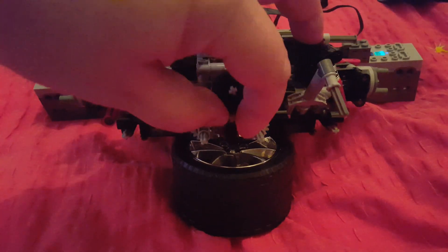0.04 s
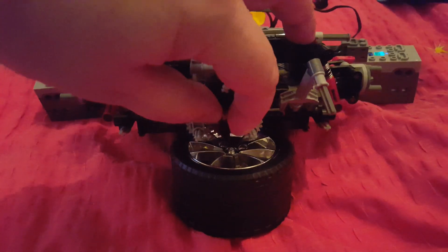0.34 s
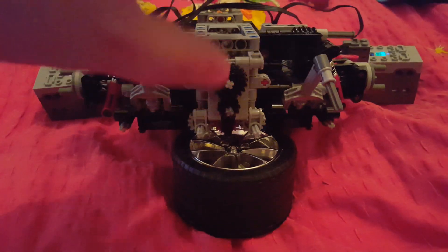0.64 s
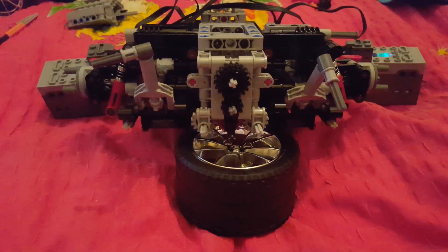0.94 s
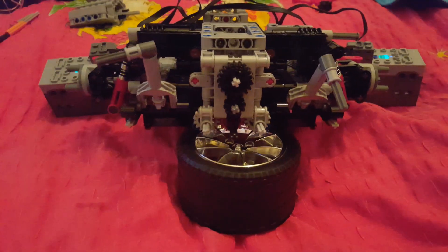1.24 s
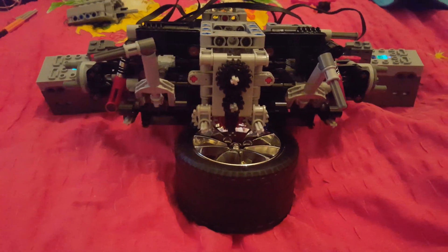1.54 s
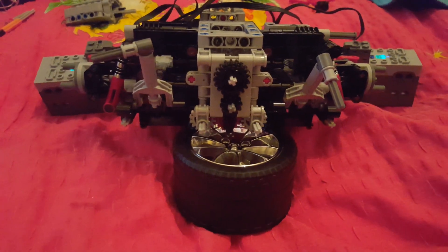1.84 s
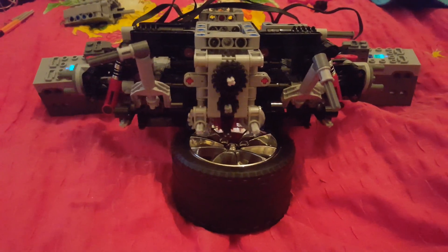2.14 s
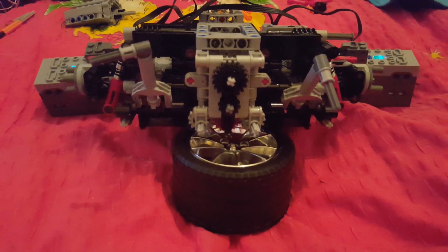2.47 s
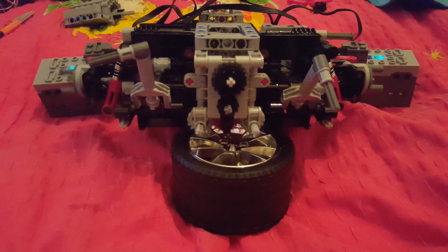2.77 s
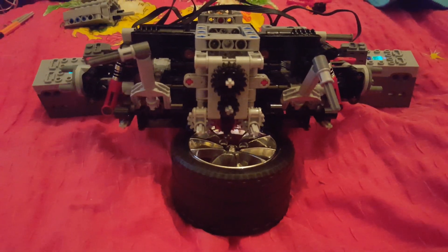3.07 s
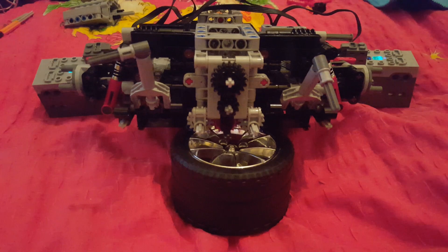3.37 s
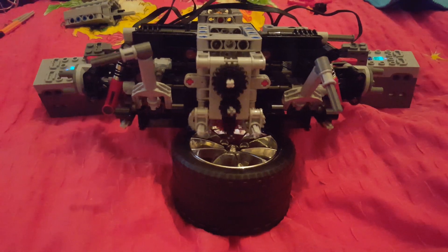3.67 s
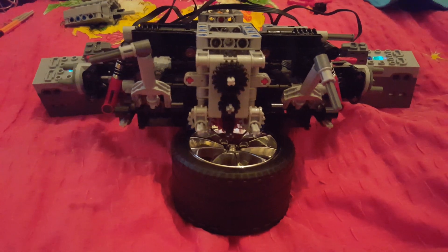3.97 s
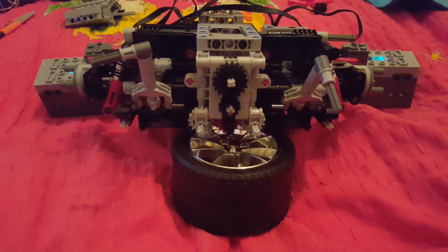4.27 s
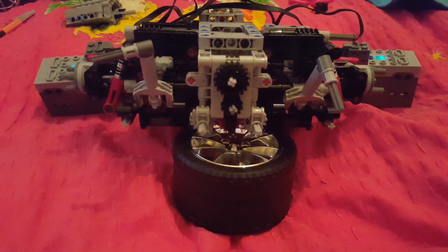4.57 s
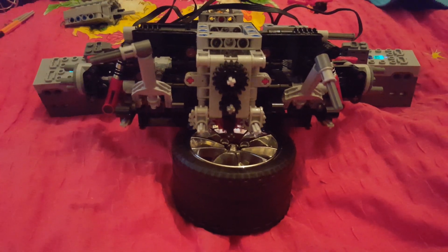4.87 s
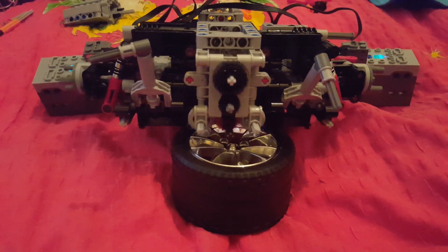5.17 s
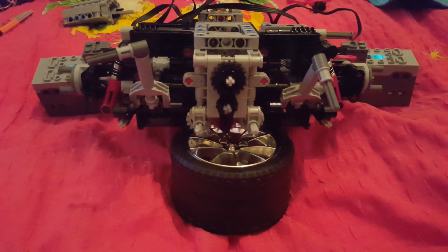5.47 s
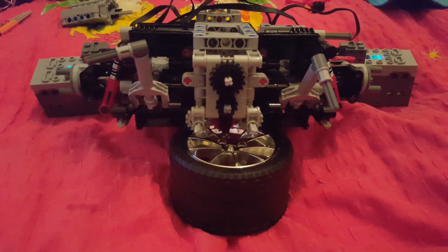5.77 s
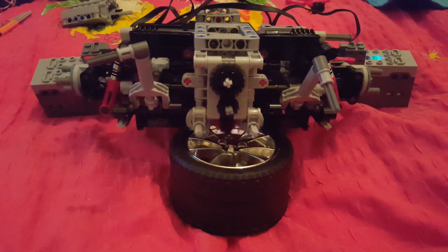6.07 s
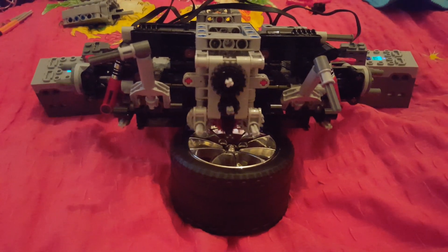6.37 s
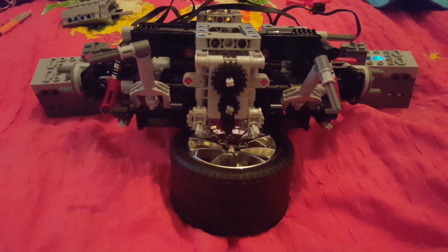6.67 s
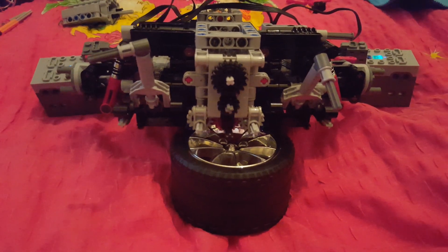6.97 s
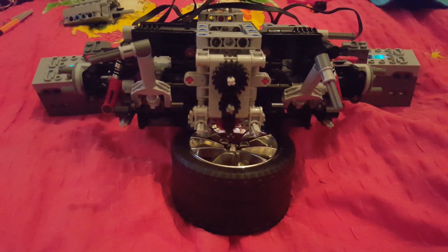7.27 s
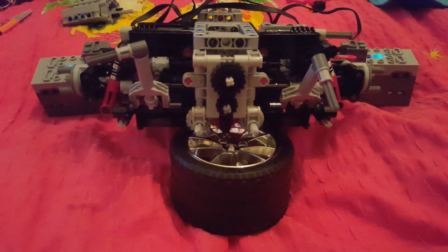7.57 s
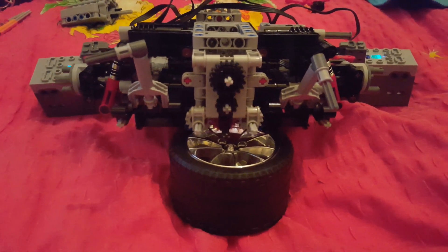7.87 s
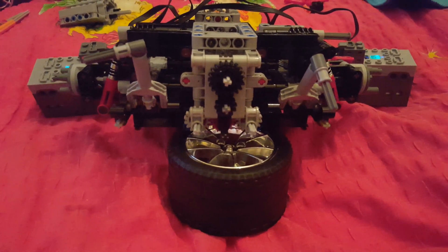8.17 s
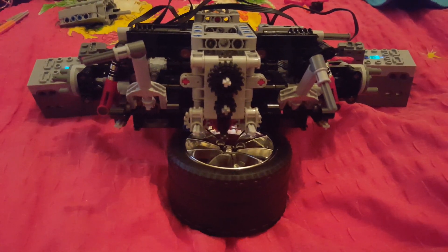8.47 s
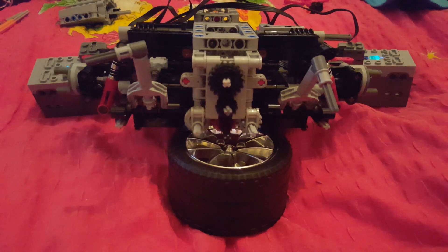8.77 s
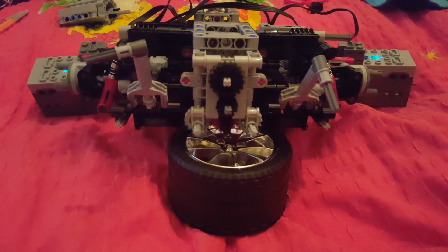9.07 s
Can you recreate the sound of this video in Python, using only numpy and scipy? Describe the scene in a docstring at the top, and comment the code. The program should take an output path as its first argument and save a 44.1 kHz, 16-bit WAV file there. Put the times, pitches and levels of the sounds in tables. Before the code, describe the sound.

A lever clicks and a plastic toy car's electric motors strain in repeated short runs, gear teeth slipping with sharp rattles indoors.

```python
"""Toy car with slipping gears

A plastic brick-built car stands on a bed in a small room and is switched on eight times.
Each time a lever clicks, the motors whirr up, and the overloaded gears jump teeth in rattling
volleys; some jumps jolt the chassis. The lever ticks as it is released and handled, and a hand
brushes the car and the sheet. The room rings briefly; a fan hums faintly behind it all."""
import sys
import numpy as np
from scipy import signal
from scipy.fft import rfft, irfft, next_fast_len
from scipy.io import wavfile
from scipy.ndimage import map_coordinates

SR = 44100
rng = np.random.default_rng(int(sys.argv[2]) if len(sys.argv) > 2 else 0)


def waveform_to_disk(signal):
    """Save audio, clipped to [-1, 1], as 16-bit WAV at the path in sys.argv[1]."""
    frames = np.transpose(np.atleast_2d(signal))
    scaled = np.clip(frames, -1, 1) * 32767
    samples = np.round(scaled).astype(np.int16)
    wavfile.write(sys.argv[1], SR, samples)


N = 410571

# motors powered: on_s, off_s, whirr_db
MOTOR_RUNS = [(2.072, 2.352, -36.5), (2.778, 2.94, -36.5), (3.657, 3.851, -37.5), (4.413, 4.661, -36.5),
              (5.219, 5.623, -36.5), (6.071, 6.679, -37.5), (7.352, 7.89, -36.5), (8.641, 9.165, -36.5)]


def gears():
    """Overloaded gears jump teeth; each snap rings the frame."""
    # snap spectrum: freq_hz, gain_db
    spectrum = [(30, -25.5), (110, -11), (300, -10.5), (520, -10), (1100, -1.5), (1900, -2.5), (2800, 2.5),
                (4000, 0.5), (5400, 0.5), (8400, 0.5), (10200, -7), (13500, -7), (16000, -13)]
    jumps = jumping_teeth()
    teeth = jumps + grazing_teeth(jumps)
    snaps = impacts(teeth, rise_s=.0036, t60_s=.013, coherence=.44, lag_samples=4, repeat=.074, tint_db=2)
    return amp(.5) * coloured(snaps, lambda hz: along(spectrum, hz) + frame_db(hz))


def jumping_teeth(build_db=2, wind_up_per_db=.01, treble_per_db=.4, lone_lead_s=.017, lone_db=-7):
    """Hits about 10 ms apart: force builds to the hardest tooth, then drains as teeth come faster."""
    # gear slips: start_s, length_s, tooth_count, peak_db, hardest_index, fall_db_per_tooth,
    # treble_db, lone_flag (one tooth gives way early)
    volleys = [(2.1258, .0133, 2, -18, 0, 5.5, 0.5, 0), (2.1594, .0405, 5, -17.2, 0, 3, -0.5, 0),
               (2.261, .0669, 6, -15.8, 5, 0, -1, 0), (2.3393, .01, 2, -17.5, 0, 4.5, -2.5, 0),
               (2.8031, .0221, 2, -24.5, 0, -0.5, -1.5, 0), (2.8475, .06, 7, -19, 0, 2, -0.5, 0),
               (3.7342, 0, 1, -19.5, 0, 0, 5, 0), (3.756, .0487, 5, -22.5, 2, 2, -0.5, 0),
               (3.8195, .0257, 3, -17.5, 1, 1, 3, 0), (4.4598, 0, 1, -21, 0, 1, -6.5, 0),
               (4.4838, .0421, 5, -20, 0, 2.7, -3, 0), (4.6113, .0437, 4, -16.7, 0, 0, 1.5, 1),
               (5.297, 0, 1, -16.5, 0, 0, 1, 0), (5.3112, .0811, 8, -19.3, 0, .65, 0.5, 0),
               (5.4277, .0114, 2, -25, 1, 0, -2.5, 0), (5.4679, .0227, 3, -16, 0, 3, 2, 1),
               (5.5198, .0365, 4, -18.5, 1, 4.5, 0.5, 0), (5.6061, .0151, 2, -19, 0, 2.5, -1, 1),
               (6.151, .0708, 7, -17, 0, 1.37, 0.5, 0), (6.2713, .0118, 2, -23.5, 1, 0, 2, 0),
               (6.3103, .0375, 4, -19, 0, 0, 0.5, 1), (6.362, .0346, 4, -17, 0, 3, 2, 0),
               (6.4299, .0228, 3, -17.8, 0, 4, 0, 0), (6.4856, .0455, 5, -17, 0, 2.5, 1.5, 1),
               (6.5471, 0, 1, -21.5, 0, 0, -1, 0), (6.5678, .0322, 4, -14.5, 0, 3.1, 0, 0),
               (6.6482, .012, 2, -16.5, 0, 4, -1, 1), (6.6783, 0, 1, -22.5, 0, 0, 1, 0),
               (7.4321, .0084, 2, -16.5, 0, 8, 1, 0), (7.4532, .0683, 7, -25, 0, 0.6, 0.5, 0),
               (7.5856, .0447, 5, -15, 1.3, 5, 2.5, 1), (7.676, .0322, 4, -16, 0, 3, 0.5, 1),
               (7.7524, .0489, 5, -14.7, 1.4, 4, 2.5, 1), (7.845, .049, 5, -18, 0, 3, -1.5, 1),
               (8.7175, .0105, 2, -14, 0, 6, -1, 0), (8.743, .0903, 9, -22, 0, .4, -1, 0),
               (8.8986, .0345, 4, -14.7, .4, 4, 1, 0), (8.9658, .0484, 5, -16, 1, 2.5, 1.5, 0),
               (9.0573, .0353, 4, -17.5, 0, 2.5, -2, 1), (9.1358, .0272, 3, -18, 0, 3, 0, 1)]
    teeth = []
    for start_s, length_s, count, peak_db, hardest, fall_db, treble_db, lone in volleys:
        past_peak = np.arange(count) - hardest
        force_db = peak_db + np.where(past_peak < 0, build_db, -fall_db) * past_peak
        # a harder snap takes longer to wind up
        wound = np.r_[0, np.cumsum(np.exp(wind_up_per_db * force_db[1:]))]
        times_s = start_s + length_s * wound / (wound[-1] + 1e-9)
        trebles_db = treble_db + treble_per_db * (force_db - force_db.mean())
        levels_db = force_db + .9 * rng.standard_normal(count)
        teeth += zip(times_s, levels_db, trebles_db)
        if lone:
            teeth.append((start_s - lone_lead_s, peak_db + lone_db, treble_db))
    return teeth


def grazing_teeth(jumps, spacing_s=.0118, wait_s=.1, level_db=-33, treble_db=-2):
    """Soft hits between volleys: the gears hold and their teeth only graze."""
    times_s = np.cumsum(spacing_s * (1 + .08 * rng.standard_normal(1000)))
    levels_db = level_db + 2 * rng.standard_normal(len(times_s))
    jumps_s = np.array([s for s, _, _ in jumps])
    return [(s, db, treble_db) for s, db in zip(times_s, levels_db)
            if any(on_s + wait_s < s < off_s for on_s, off_s, _ in MOTOR_RUNS)
            and abs(jumps_s - s).min() > spacing_s]


def chassis():
    """Some jumps knock the chassis: a low thud under the snap."""
    # chassis knocks: start_s, level_db
    jolts = [(2.3, -21), (2.824, -26), (2.897, -32), (3.831, -24), (4.483, -23), (4.638, -22), (6.647, -23),
             (6.66, -28), (8.716, -23), (8.91, -25), (9.054, -29)]
    # thud spectrum: freq_hz, gain_db
    spectrum = [(40, -10), (130, -2), (300, -1), (500, 0), (1100, -3), (1800, -12), (4000, -35),
                (16000, -60)]
    hits = [(s, db, 0) for s, db in jolts]
    knocks = impacts(hits, rise_s=.003, t60_s=.02, coherence=.7, lag_samples=4, repeat=.2, tint_db=1)
    return amp(-5) * coloured(knocks, lambda hz: along(spectrum, hz))


def motors(spin_up_s=.016, coast_s=.016, mesh_hz=2050, mesh_db=-12, grit_db=2):
    """Gear trains whirr: grit of sliding teeth over a rough meshing tone."""
    # sliding-tooth spectrum: freq_hz, gain_db
    spectrum = [(40, -20), (130, 0), (450, -12), (800, -4.5), (1500, -4.5), (2200, -0.5), (3800, -4),
                (5600, -0.5), (7400, 0.5), (8900, -2.5), (9900, -16), (12500, -13), (16000, -22.5)]
    t = np.arange(N) / SR
    level, speed = np.zeros(N), np.zeros(N)
    for on_s, off_s, whirr_db in MOTOR_RUNS:
        spin_up = 1 - np.exp(-np.maximum(t - on_s, 0) / spin_up_s)
        turning = spin_up * np.exp(-np.maximum(t - off_s, 0) / coast_s)
        level += amp(whirr_db) * turning
        speed += np.sqrt(turning)
    # loaded shafts run unevenly
    travel_s = np.cumsum(speed * (1 + .04 * wobble(30) + .04 * wobble(400))) / SR
    sliding = unit_rms(amp(grit_db * wobble(1500)) * stereo_noise(N, .63, lag_samples=3))
    grit = coloured(sliding, lambda hz: along(spectrum, hz) + frame_db(hz))
    mesh = amp(mesh_db + 2.8 * wobble(90)) * np.sin(2 * np.pi * mesh_hz * travel_s)
    return level * (grit + mesh)


def frame_db(hz):
    """Gain of the plastic frame's resonances."""
    # frame resonances: centre_hz, width_hz, gain_db
    modes = [(262, 50, 4), (910, 110, 5.5), (1050, 80, -3.5), (1290, 160, 2), (1770, 140, 2),
             (2210, 130, 2), (2560, 220, 1.5), (2850, 160, 2), (4470, 250, 2)]
    return sum(db / (1 + (2 * (hz - centre_hz) / width_hz) ** 2) for centre_hz, width_hz, db in modes)


def lever():
    """The control lever clacks against its stop and rings on briefly."""
    # lever pushes: start_s, level_db, treble_db
    pushes = [(2.0381, -25.5, -3.5), (2.6873, -29.5, -6.5), (3.5875, -27.5, -2), (4.3646, -28.5, -4.5),
              (5.1394, -21.5, 0), (6.012, -33.5, -5.5), (7.2733, -23, 1.5), (8.5925, -25.5, -1)]
    # clack spectrum: freq_hz, gain_db
    spectrum = [(40, -17), (150, -5), (420, -8.5), (620, -1.5), (860, 0.5), (1050, -0.5), (1500, -1.5),
                (1900, -8), (2300, 7), (2750, -5.5), (3400, 1), (6000, -3.5), (7000, -11), (16000, -20)]
    # lever modes: freq_hz, level_db, t60_s
    modes = [(2300, -15, .028), (2417, -21, .045), (4850, -12, .012)]
    clacks = impacts(pushes, rise_s=.0014, t60_s=.012, coherence=.72, lag_samples=14, repeat=.3, tint_db=1)
    clacks = coloured(clacks, lambda hz: along(spectrum, hz))
    t = np.arange(SR // 8) / SR
    for start_s, push_db, _ in pushes:
        for hz, mode_db, t60_s in modes:
            decay = amp(push_db + mode_db + rng.normal(0, 2) - 60 * t / t60_s)
            add(clacks, start_s, decay * np.sin(2 * np.pi * hz * t))
    return amp(-.6) * clacks


def lever_and_handling_ticks():
    """Light plastic clicks as the control lever is released and handled."""
    # contacts: start_s, level_db, treble_db
    hits = [(.507, -64, -6), (.628, -58, 0), (1.6378, -39.5, 3), (1.678, -58, -9), (1.701, -57.5, -14),
            (1.724, -63, -12), (3.0558, -38.5, 2), (3.151, -51.5, -8), (3.915, -51, -11), (5.764, -41, 2),
            (7.965, -41.5, -6), (8.173, -39, 1), (9.2582, -33, 6)]
    # tick spectrum: freq_hz, gain_db
    spectrum = [(100, -17), (800, -7), (1800, -6), (2600, 0), (4500, -2), (7000, -7), (10000, -13),
                (16000, -19)]
    ticks = impacts(hits, rise_s=.0037, t60_s=.029, coherence=.3, lag_samples=11, repeat=.091, tint_db=2)
    return coloured(ticks, lambda hz: along(spectrum, hz))


def hand():
    """A hand brushes car and sheet: soft, uneven bands of noise."""
    # strokes: start_s, length_s, level_db, centre_hz, width_octaves
    strokes = [(0.139, 0.19, -69.5, 1180, 0.94), (0.476, .09, -66, 990, 0.59), (0.98, .21, -70, 7700, 0.58)]
    track = np.zeros((2, N))
    for start_s, length_s, level_db, centre_hz, width_octaves in strokes:
        size = 2 * round(length_s * SR / 2)
        octaves = np.log2((np.fft.rfftfreq(size, 1 / SR) + 1) / centre_hz)
        band = 1 / (1 + (octaves / width_octaves) ** 2)
        friction = irfft(rfft(stereo_noise(size, .35)) * band)
        stroke = unit_rms(friction * amp(3 * wobble(68)[:size]))
        add(track, start_s, amp(level_db) * signal.windows.tukey(size, .5) * stroke)
    return track


def room(x, delay_s=.0044, build_s=.0024):
    """Diffuse wall reflections; each short block of sound excites a different tail."""
    # room decay: freq_hz, t60_s
    decay = [(100, .22), (500, .27), (1400, .29), (4000, .28), (8000, .25), (15000, .25)]
    # reflection spectrum: freq_hz, gain_db
    spectrum = [(100, -3), (1000, 0), (8000, 0), (15000, -7)]
    wet, block = np.zeros((2, N)), SR // 8
    t = np.arange(SR // 2) / SR
    swell = 1 - np.exp(-np.maximum(t - delay_s, 0) / build_s)
    for start in range(0, N, block):
        piece = x[:, start:start + block]
        if np.max(abs(piece)) < 1e-4:
            continue
        hz, age_s, bins = signal.stft(stereo_noise(len(t), .23), SR, nperseg=256)
        fade = amp(along(spectrum, hz)[:, None] - 60 * age_s / along(decay, hz)[:, None])
        tail = signal.istft(bins * fade, SR, nperseg=256)[1][:, :len(t)] * swell
        add(wet, start / SR, signal.fftconvolve(piece, tail / np.linalg.norm(tail[0]), axes=1))
    return wet


def air_and_fan():
    """Room air, nearly mono in the bass, with wavering fan and mains hum."""
    # air spectrum: freq_hz, gain_db
    spectrum = [(20, -18), (68, -8), (107, -4), (150, -10.5), (182, -6.5), (216, -12.5), (285, -11.5),
                (600, -20.5), (950, -26), (2500, -31.5), (5000, -38), (10500, -45), (14500, -40.5),
                (16000, -47.5)]
    # stereo width: freq_hz, side_to_mid_db
    width = [(40, -11), (250, -9.5), (2000, 1)]
    # fan and mains lines: freq_hz, level_db
    lines = [(100, -69), (120, -66), (242, -78), (1362, -80.5)]
    t = np.arange(N) / SR
    mid, side = unit_rms(coloured(rng.standard_normal((2, N)), lambda hz: along(spectrum, hz)))
    size = next_fast_len(N)
    side_gain = amp(along(width, np.fft.rfftfreq(size, 1 / SR)))
    side = irfft(rfft(side, size) * side_gain, size)[:N]
    hum = sum(amp(db) * np.sqrt(2) * np.sin(2 * np.pi * hz * t + .4 * wobble(4.2)) for hz, db in lines)
    return amp(-62.5) * np.array([mid + side, mid - side]) + hum


def impacts(hits, rise_s, t60_s, coherence, lag_samples, repeat, tint_db):
    """Hits (start_s, level_db, treble_db) briefly ring dense plastic modes."""
    size, loud_samples, lead_s, crest_s = 2048, 200, .002, .0004
    t = np.arange(size) / SR - lead_s - crest_s
    hz = np.fft.rfftfreq(size, 1 / SR)
    envelope = amp(-60 * abs(t) / np.where(t < 0, rise_s, t60_s))
    knots_hz = np.geomspace(200, 16000, 14)
    tilt = np.clip(np.log2(knots_hz / 2500) / 2, 0, 1) - .5
    body = stereo_noise(size, coherence, lag_samples)
    track = np.zeros((2, N))
    for start_s, level_db, treble_db in hits:
        # repeat: power share of the body's ring; the rest belongs to the struck spot
        spot = stereo_noise(size, coherence, lag_samples)
        ring = envelope * (np.sqrt(repeat) * body + np.sqrt(1 - repeat) * spot)
        tint = amp(tint_db * rng.standard_normal(len(knots_hz)) + treble_db * tilt)
        ring = irfft(rfft(unit_rms(ring)) * np.interp(hz, knots_hz, tint))
        add(track, start_s - lead_s, amp(level_db) * np.sqrt(loud_samples / size) * ring)
    return track


def coloured(x, gain_db):
    """Minimum-phase filter of mean power 1, shaped by gain_db(hz)."""
    size = 8192
    gain = unit_rms(amp(gain_db(np.fft.rfftfreq(size, 1 / SR))))
    cepstrum = irfft(np.log(np.maximum(gain, 1e-6)))
    fold = np.r_[1, np.full(size // 2 - 1, 2), 1, np.zeros(size // 2 - 1)]
    impulse = irfft(np.exp(rfft(cepstrum * fold)))
    return signal.oaconvolve(x, impulse[None], axes=1)[:, :N]


def stereo_noise(size, coherence, lag_samples=0):
    """Noise whose shared part arrives later on the right."""
    shared, left, right = rng.standard_normal((3, size))
    lagged = np.array([shared, np.roll(shared, lag_samples)])
    return np.sqrt(coherence) * lagged + np.sqrt(1 - coherence) * np.array([left, right])


def wobble(rate_hz):
    """Smooth random curve with knots at rate_hz."""
    knots = rng.standard_normal(int(N * rate_hz / SR) + 4)
    return map_coordinates(knots, [np.arange(N) * rate_hz / SR])


def along(points, hz):
    """Interpolate (freq_hz, value) points on a log axis."""
    knots_hz, values = np.transpose(points)
    return np.interp(np.log(hz + 1), np.log(knots_hz + 1), values)


def amp(db):
    """Decibels to gain."""
    return 10 ** (np.asarray(db) / 20)


def unit_rms(x):
    """Scale to rms 1."""
    return x / np.sqrt(np.mean(x ** 2) + 1e-20)


def add(track, start_s, sound):
    """Mix a sound into the track."""
    start = max(round(start_s * SR), 0)
    track[:, start:start + sound.shape[-1]] += sound[..., :max(N - start, 0)]


def scene():
    """Car at arm's length; lever and handling nearer, drier and slightly left."""
    background = air_and_fan()
    near = (lever() + lever_and_handling_ticks() + hand()) * amp([[.8], [-.8]])
    car = (motors() + gears() + chassis()) * amp([[.1], [-.1]])
    return car + near + room(amp(-14) * car + amp(-20) * near) + background


def record(dry):
    """Soft peak limiting, then a low-pass."""
    ceiling, top_hz, taper_hz = .9, 16700, 900
    rounded = dry / (1 + (dry / ceiling) ** 4) ** (1 / 4)
    size = next_fast_len(N + SR // 4)
    passband = np.clip((top_hz - np.fft.rfftfreq(size, 1 / SR)) / taper_hz, 0, 1)
    return irfft(rfft(rounded, size) * passband, size)[:, :N]


dry = scene()
out = record(dry)
waveform_to_disk(out)
```